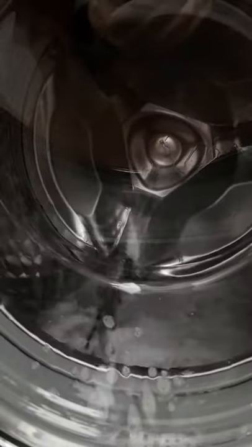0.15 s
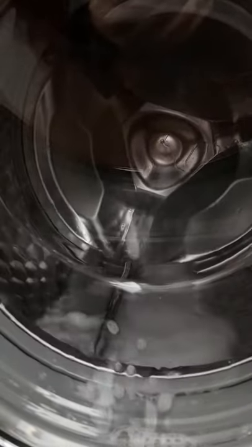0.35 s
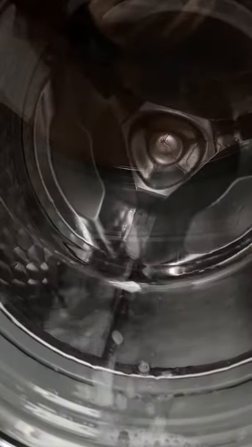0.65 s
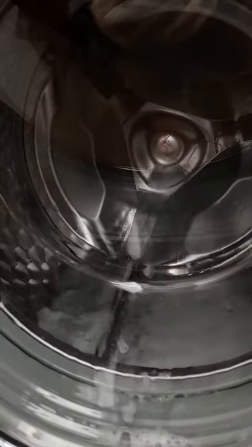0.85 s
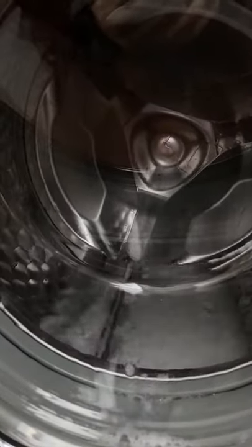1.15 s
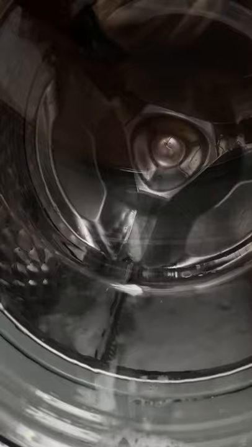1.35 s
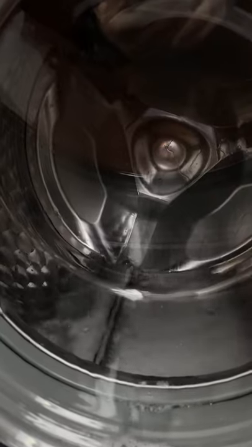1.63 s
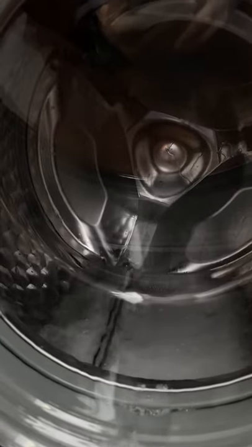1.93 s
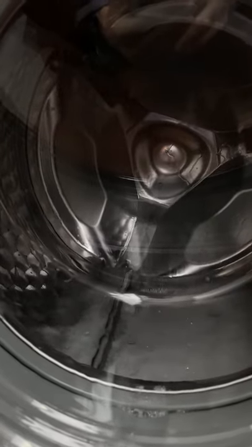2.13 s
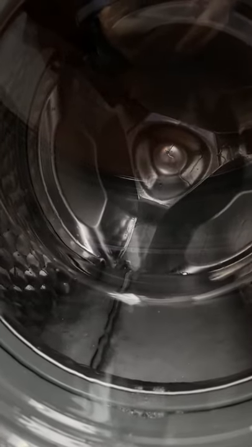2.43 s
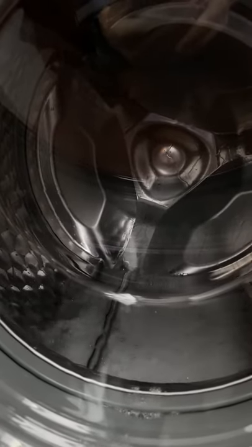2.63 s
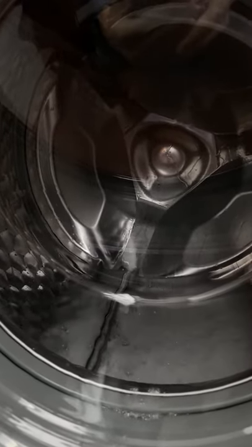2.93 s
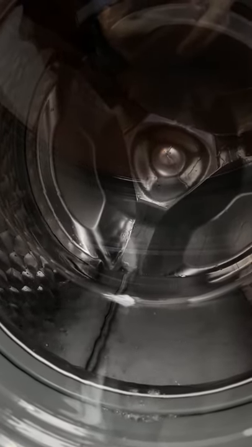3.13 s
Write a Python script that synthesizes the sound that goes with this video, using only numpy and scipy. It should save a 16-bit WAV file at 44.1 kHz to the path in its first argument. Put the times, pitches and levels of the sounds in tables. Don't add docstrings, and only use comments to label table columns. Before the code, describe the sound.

Water trickles and splashes in a front-loading washing machine, with bubbly plops and ringing metallic drips, then fades to sparse drops over a low wavering hum. Close stereo phone microphone in a small, lightly reverberant room.

```python
import sys
import numpy as np
from scipy import signal
from scipy.fft import rfft, irfft, next_fast_len
from scipy.io import wavfile
from scipy.ndimage import uniform_filter1d, map_coordinates

SR = 44100
rng = np.random.default_rng(int(sys.argv[2]) if len(sys.argv) > 2 else 0)


def gain_from_db(level_db):
    decades = np.asarray(level_db, float) / 20
    return 10 ** decades


def unload_wav(signal):
    wavfile.write(
        sys.argv[1],
        SR,
        np.round(np.clip(np.atleast_2d(signal).T, -1, 1) * 32767).astype(np.int16),
    )


N = 144648

# time in seconds, level in dB.
WATER_FLOW = [(0, -75), (.22, -77), (.42, -88), (.6, -77), (.78, -77.5), (.87, -72.5), (1.22, -76),
              (1.5, -75.5), (1.76, -84), (1.88, -72.5), (1.99, -85), (2.06, -83.5), (2.2, -89.5),
              (2.36, -84.5), (2.76, -89), (3.28, -90)]
# frequency in Hz, density in dB per Hz.
WATER_COLOUR = [(410, -48), (700, 10), (2320, -4), (2560, -2), (6090, -20), (13000, -75.5)]
# start in seconds, level in dB, pitch in Hz.
PLOP_EVENTS = [(0.2466, -41, 1088), (0.386, -52, 1874), (0.632, -52.5, 1134), (0.929, -48.5, 1058),
               (1.0135, -46.5, 1900), (1.0428, -44, 1075), (1.2711, -41.5, 1207), (1.4344, -45, 1266),
               (1.5484, -46, 1973), (1.716, -50.5, 1000), (1.8182, -43.5, 1178), (1.9144, -52, 1397),
               (2.0313, -55, 2630), (2.1334, -53, 1162), (2.338, -50.5, 1708), (2.5174, -56.5, 1370),
               (2.5888, -58, 1290), (2.686, -57.5, 1205), (2.7537, -58, 1067), (3.235, -55.5, 661),
               (2.831, -65, 622.3), (1.655, -45.5, 880)]


def unit(x):
    return x / np.sqrt(np.mean(x ** 2) + 1e-20)


def along(points, hz):
    f, v = np.transpose(points)
    return np.interp(np.log(hz + 1), np.log(f + 1), v)


def curve(rows):
    return np.interp(np.arange(N) / SR, *np.transpose(rows))


def wobble(rate):
    knots = rng.standard_normal(int(N * 60 / SR) + 4)
    return map_coordinates(knots, [np.arange(N) * np.clip(rate, 0, 59) / SR])


def filtered(x, response):
    m = next_fast_len(N + SR // 2)
    return irfft(rfft(x, m) * response(np.fft.rfftfreq(m, 1 / SR)), m)[..., :N]


def peak(f, c, w):
    return 1j * f * w / (c * c - f * f + 1j * f * w)


def patchy(depth_db):
    z = signal.stft(rng.standard_normal((2, N)), nperseg=512)[2]
    field = rng.standard_normal(z.shape[1:])
    field = uniform_filter1d(field, size=6, axis=0)
    field = uniform_filter1d(field, size=7, axis=1)
    noise = signal.istft(z * gain_from_db(depth_db * unit(field)), nperseg=512)[1]
    return unit(noise[:, :N])


def hiss(spectrum, depth_db):
    return unit(filtered(patchy(depth_db), lambda hz: gain_from_db(along(spectrum, hz))))


def bubbles(s, hz, gain, cycles, size):
    t = np.arange(size) / SR
    u = hz[:, None] * t / cycles
    wave = gain[:, None] * np.sin(2 * np.pi * cycles * (u + 0.037 * u * u))
    wave = wave * np.exp(-u) * (1 - np.exp(-6 * u)) * np.hanning(2 * size)[size:]
    at = np.round(s * SR).astype(int)[:, None] + np.arange(size)
    return np.bincount(at.ravel(), wave.ravel(), N + 2 * SR)[:N]


def ports(pair):
    # frequency in Hz, left-right likeness from 0 to 1.
    likeness = [(180, 0.94), (350, 0.76), (700, 0.063), (1500, 0.17), (12000, 0.83)]
    # frequency in Hz, phase by which left leads in radians.
    phase_lead = [(300, 0), (600, -.9), (1380, .3), (3530, 1.3), (4400, 2), (4950, 3.1), (5600, 5.9),
                  (8000, 7.9), (14000, 8.2)]
    # frequency in Hz, left over right in dB.
    level_tilt = [(300, 0), (670, 2), (1400, -2), (4130, -2), (8000, 0)]
    half = np.array([[.5], [-.5]])

    def spread(hz):
        turn = np.arccos(np.clip(along(likeness, hz), 0, 1)) / 2
        return np.array([np.cos(turn), np.sin(turn)])

    def difference(hz):
        return gain_from_db(half * along(level_tilt, hz)) * np.exp(1j * half * along(phase_lead, hz))

    a, b = filtered(pair, spread)
    return filtered(np.array([a + b, a - b]), difference)


def cabinet_hum():
    # time in seconds, level in dB.
    hum_level = [(0, -40.5), (.15, -40.5), (.46, -45), (.65, -38.5), (.83, -44.5), (.89, -52), (1.1, -42.5),
                 (1.19, -47), (1.25, -42.5), (1.49, -41), (1.64, -50), (1.76, -46.5), (1.89, -49),
                 (2.16, -41), (2.6, -45.5), (2.71, -38.5), (3.06, -48.5), (3.28, -48)]
    hum_hz, drift_hz, flutter_db = 46.1, 1.474, 1.5
    phase = 2 * np.pi * np.cumsum(hum_hz + drift_hz * wobble(7.6)) / SR
    return np.sqrt(2) * gain_from_db(curve(hum_level) + flutter_db * wobble(9.03)) * np.cos(phase + 0.87)


def front_panel():
    # time in seconds, frequency in Hz, level in dB.
    panel_note = [(0, 101.5, -67), (.08, 105, -54.5), (.36, 99.2, -58), (.62, 103, -59.5),
                  (1.0, 100.3, -56.5), (1.3, 101, -62.5), (1.61, 102.2, -60.5), (1.811, 100.6, -53),
                  (1.949, 102, -67.5), (2.029, 104.6, -58), (2.289, 97.2, -51), (2.35, 101.4, -77),
                  (2.43, 105.8, -55.5), (2.56, 102.3, -65), (3.161, 101, -57.5), (3.28, 102.4, -62)]
    flutter_db = 2
    s, hz, db = np.transpose(panel_note)
    t = np.arange(N) / SR
    phase = 2 * np.pi * np.cumsum(np.interp(t, s, hz)) / SR
    return np.sqrt(2) * gain_from_db(np.interp(t, s, db) + flutter_db * wobble(16)) * np.sin(phase)


def panel_drone():
    # frequency in Hz, width in Hz, level in dB.
    panel_modes = [(57.1, 5.7, 8.5), (77.6, 32, -11.5), (101, 32, -13.5), (122.9, 15, -3.5),
                   (157.1, 13, -15), (182.6, 11, -11.5)]
    drone_db = -53

    def panels(f):
        return sum((-1) ** k * gain_from_db(db) * peak(f, c, w) ** 2 for k, (c, w, db) in enumerate(panel_modes))

    drone = filtered(rng.standard_normal((2, N)), panels)
    return gain_from_db(drone_db) * ports(drone / np.std(filtered(rng.standard_normal(N), panels)))


def room_air():
    # frequency in Hz, density in dB per Hz.
    air_colour = [(100, -31), (190, -5.5), (330, -32), (600, -21), (1000, -44), (14300, -60.5)]
    air_db = -65
    return gain_from_db(air_db) * ports(hiss(air_colour, depth_db=4.0))


def trickle():
    count, scatter_db = 3000, 4.5
    start_s = rng.random(count) * N / SR
    pitch_hz = 2500 * np.exp(0.698 * rng.standard_normal(count)).clip(.1, 5)
    gain = gain_from_db(scatter_db * rng.exponential(size=count).clip(0, 4))
    fizz = bubbles(start_s, pitch_hz, gain, cycles=15.0, size=300)
    fizz = filtered(fizz, lambda hz: gain_from_db(7.2 * np.log2(hz / 2500 + 0.033)))
    mix = patchy(depth_db=4.0) + 0.35 * unit(fizz) * np.array([[1], [0]])
    water = filtered(mix, lambda hz: gain_from_db(along(WATER_COLOUR, hz)))
    band = filtered(water[0], lambda hz: (hz > 2100) & (hz < 9000))
    return gain_from_db(curve(WATER_FLOW) + 2.2 * wobble(17)) * water / np.std(band)


def pool():
    # time in seconds, level in dB.
    slosh_level = [(0, -70), (.3, -62.5), (.65, -62), (1.05, -58.5), (1.6, -62), (1.85, -63.5),
                   (2.0, -66.5), (2.25, -62.5), (2.5, -69), (2.75, -64.5), (3.16, -72.5), (3.28, -67.5)]
    # frequency in Hz, width in Hz, level in dB.
    air_modes = [(260.2, 25.3, 3), (299, 74, -5.5), (364.6, 19.6, -1.5), (429, 34.5, -9), (587.7, 56, -7.5),
                 (776, 126, -11.5), (1000, 292, -17.5)]
    lump_db = 2

    def hollow(f):
        return sum((-1) ** k * gain_from_db(db) * peak(f, c, w) for k, (c, w, db) in enumerate(air_modes))

    gurgle = unit(filtered(patchy(depth_db=1.0), hollow))
    return gain_from_db(curve(slosh_level) + lump_db * wobble(13)) * gurgle


def drum(x):
    # frequency in Hz, width in Hz, level in dB.
    drum_modes = [(1174, 32, 1), (1423, 17, -12), (1884, 56, -5), (2590, 51, -11.5), (2923, 43, -4.5)]
    narrowing, ring_db, wander_db = 0.62, 16, -5.5
    first_db = along(WATER_COLOUR, drum_modes[0][0])
    out = 0
    for c, w, db in drum_modes:
        gain = gain_from_db(ring_db + db - along(WATER_COLOUR, c) + first_db)
        drive = x * gain_from_db(wander_db * wobble(8.57))
        out = out + filtered(drive, lambda f: gain * peak(f, c, narrowing * w))
    return out


def door(x):
    # frequency in Hz, width in Hz, gain in dB.
    glass_modes = [(3653, 29, 8), (4108, 85, 7), (4460, 60, 9), (4890, 97, 9), (5300, 17, 5.5),
                   (5760, 110, 7), (6290, 32, 9.5), (6710, 40, 4), (7340, 69, 10), (7800, 15, 10.5),
                   (8030, 68, 11), (9700, 160, 8.5), (10240, 96, 15), (12300, 90, 14)]
    return filtered(x, lambda f: 0.7 + sum(gain_from_db(db) * peak(f, c, w) for c, w, db in glass_modes))


def dying(s, db, decay_s):
    t = np.arange(N) / SR
    rise_s = .004
    return gain_from_db(db) * np.clip((t - s) / rise_s, 0, 1) * np.exp(-np.abs(t - s) / decay_s)


def spatter():
    # start in seconds, level in dB, decay in seconds.
    tick_events = [(.015, -66, 0.015), (.092, -65.5, .02), (0.156, -64.5, 0.0063), (.28, -65.5, 0.014),
                   (0.42, -81, 0.007), (0.456, -83, 0.013), (0.503, -84, 0.017), (0.839, -75, 0.04),
                   (0.942, -65, 0.011), (1.042, -71.5, 0.015), (1.185, -69.5, 0.0073),
                   (1.295, -63.5, 0.0078), (1.431, -73, .015), (1.502, -67.5, 0.0155), (1.642, -72, 0.0099),
                   (2.028, -71.5, 0.0096), (2.925, -79, 0.0067)]
    # frequency in Hz, density in dB per Hz.
    tick_colour = [(1500, -7.5), (3000, 11), (6000, 3.5), (8500, -13.5), (10500, -19), (12500, -13),
                   (15000, -24.5)]
    return sum(dying(*row) for row in tick_events) * hiss(tick_colour, depth_db=3)


def sheets():
    # end in seconds, level in dB, build-up in seconds.
    sheet_events = [(.02, -79, 0.066), (0.298, -66, 0.045), (0.468, -56.5, .11), (.56, -71, 0.038),
                    (0.899, -65, 0.15), (1.0, -63, 0.093), (1.1, -68.5, 0.028), (1.33, -67, 0.064),
                    (1.689, -71, 0.082), (1.928, -63, .13), (2.08, -73, 0.035), (2.289, -77, .04),
                    (2.948, -64.5, 0.16)]
    # frequency in Hz, density in dB per Hz.
    sheet_colour = [(900, 4.5), (1800, -7), (2600, -1), (4500, -18), (8000, -26.5), (13000, -51)]
    stop_s, lump_db = .022, 1.5
    t = np.arange(N) / SR
    swell = 0
    for s, db, rise in sheet_events:
        fall = np.where(t < s, np.abs((s - t) / rise) ** 3, (t - s) / stop_s)
        swell = swell + gain_from_db(db) * np.exp(-fall)
    return swell * gain_from_db(lump_db * wobble(27.89)) * hiss(sheet_colour, depth_db=3)


def slaps():
    # frequency in Hz, density in dB per Hz.
    slap_colour = [(300, -18.5), (600, 12), (1300, 1), (2200, -8.5), (3500, -18.5), (7000, -35.5)]
    slap_db, decay_s = -15, 0.04
    envelope = sum(dying(s, db + slap_db, decay_s) for s, db, _ in PLOP_EVENTS)
    return envelope * hiss(slap_colour, depth_db=3)


def burst(rows, cycles, length_s, db, count):
    fade_db, late_start, spread = 3.5, .2, .3
    s, level_db, hz = np.transpose(rows)[:, :, None]
    draw = rng.random((len(rows), 5, count))
    late = -np.log(1 - draw[:, 0]) + late_start * draw[:, 4]
    pitch = np.minimum(hz * np.exp(spread * (draw[:, 1] + draw[:, 3] - 1)), SR / 3)
    gain = gain_from_db(level_db + db - fade_db * late - 6.7 * draw[:, 2])
    return bubbles((s + late * length_s).ravel(), pitch.ravel(), gain.ravel(), cycles, size=800)


def splashes():
    # start in seconds, level in dB, pitch in Hz.
    spray_events = [(0.0258, -82, 3860), (0.0918, -59.5, 6170), (0.192, -60, 5730), (0.2445, -56.5, 3710),
                    (0.4284, -68, 4130), (0.5083, -59.5, 4030), (0.8235, -59, 3830), (1.0894, -63, 3890),
                    (1.2538, -60.5, 3720), (1.295, -55, 4328), (1.5482, -65.5, 4660), (1.6442, -60.5, 4330),
                    (1.8138, -63, 5710), (2.0324, -74, 4140), (2.6002, -71.5, 4150)]
    # start in seconds, level in dB, pitch in Hz.
    spit_events = [
        (0.1584, -59.5, 7340),
        (0.4249, -59, 8300),
        (0.841, -57, 10500),
        (0.947, -53, 7300),
        (1.0494, -61.5, 7400),
        (1.1862, -62, 7280),
        (1.4306, -55.5, 6680),
        (1.503, -54, 6570),
        (2.9164, -65, 7790),
    ]
    hits = burst(spray_events, cycles=14, length_s=.016, db=-7, count=60)
    hits = hits + burst(spit_events, cycles=16, length_s=.01, db=-15.5, count=50)
    return hits + burst(PLOP_EVENTS, cycles=13, length_s=.018, db=-6.0, count=30)


def drips():
    # start in seconds, level in dB.
    drip_events = [(0.079, -57.5), (0.092, -55.5), (0.174, -48), (0.287, -53.5), (0.468, -52.5),
                   (0.506, -55), (0.959, -50), (0.969, -59), (1.151, -51), (1.328, -47), (1.459, -52),
                   (1.552, -47.5), (1.64, -55), (1.951, -56), (2.067, -60), (2.321, -59), (2.359, -57.5),
                   (2.451, -64.5), (0.334, -50), (0.707, -43.5), (1.046, -47), (1.14, -49.5), (2.03, -67.5),
                   (2.7, -55.5), (1.99, -62), (2.11, -64.5), (1.405, -57), (1.632, -49.5), (1.58, -45),
                   (2.64, -46), (1.695, -58.5), (2.911, -61)]
    drip_pitch = [1906, 6300, 579, 2933, 1218, 2920, 2896, 1890, 2820, 1172, 1920, 1185, 2910, 2920, 2915,
                  2580, 1198, 2166, 245, 259.5, 260, 262, 5760, 1180, 2923, 2923, 4890, 1174, 186, 186,
                  1884, 3050]
    rise_s, t60_s, drip_db, low_linger = 0.0032, 0.14, -3.5, .3
    out = np.zeros(N + SR)
    t = np.arange(SR // 3) / SR
    for (s, db), hz in zip(drip_events, drip_pitch):
        u = t * (hz / 2000) ** low_linger
        envelope = gain_from_db(db + drip_db - 60 * u / t60_s) * (1 - np.exp(-u / rise_s))
        out[round(s * SR):][:len(t)] += envelope * np.sin(2 * np.pi * hz * t)
    return out[:N]


def room(x):
    # frequency in Hz, reverberation time T60 in seconds.
    decay_time = [(1000, 0.16), (9000, 0.088)]
    hz, t, z = signal.stft(rng.standard_normal((2, SR // 3)), SR, nperseg=256)
    tail = signal.istft(z * gain_from_db(-60 * t / along(decay_time, hz)[:, None]), SR, nperseg=256)[1]
    delayed = np.pad(x, (200, 0))[None]
    return signal.fftconvolve(delayed, tail / np.linalg.norm(tail[0]), axes=1)[:, :N]


def motor_whine():
    # time in seconds, level in dB.
    whine_level = [
        (1.8, -94),
        (2.8, -81),
        (3.05, -84.5),
        (3.2, -94),
    ]
    whine_hz = 1290
    t = np.arange(N) / SR
    level = gain_from_db(curve(whine_level) + 2.4 * wobble(10.02))
    return level * np.sin(2 * np.pi * whine_hz * t + 2.4 * wobble(3.0))


def scene():
    room_db, hits_ring, sheets_ring = -16.5, .25, .5
    steady_ring_db, ring_growth = -4, .7
    stream = trickle()
    washes = sheets() + slaps() + spatter()
    hits = splashes()
    struck = door(hits) + hits_ring * drum(hits + sheets_ring * washes[0]) + drips()
    shared, apart = gain_from_db(room_db) * room(struck)
    growth_db = ring_growth * (curve(WATER_FLOW) - WATER_FLOW[0][1])
    ring = drum(stream[0] * gain_from_db(steady_ring_db + growth_db))
    water = door(stream + washes) + pool() + np.array([struck + shared + ring, 2.0 * apart])
    machine = cabinet_hum() + front_panel() + motor_whine() + panel_drone() + room_air()
    return ports(water) + machine


def top_cut(x):
    return signal.sosfilt(signal.butter(12, 14440, fs=SR, output="sos"), x)


def record(dry):
    mid_top_hz, mono_hz = 12380, 130
    mid = filtered(dry[0] + dry[1], lambda hz: .5 * (hz < mid_top_hz))
    side = filtered(dry[0] - dry[1], lambda hz: .5 / (1 + (mono_hz / (hz + 1)) ** 4))
    return top_cut(np.array([mid + side, mid - side]))


dry = scene()
out = record(dry)
unload_wav(out)
```